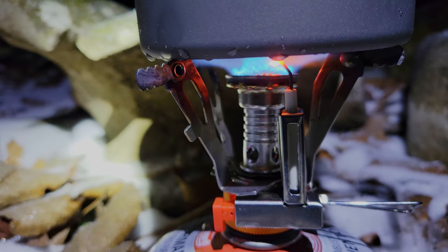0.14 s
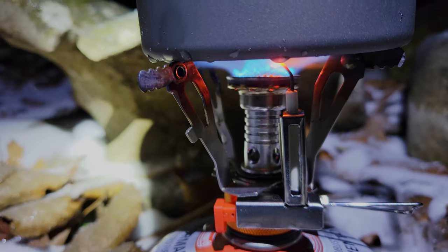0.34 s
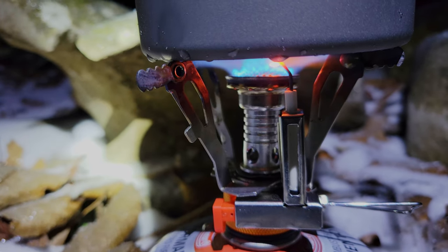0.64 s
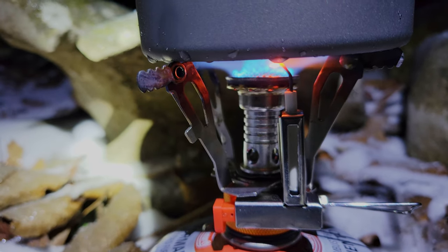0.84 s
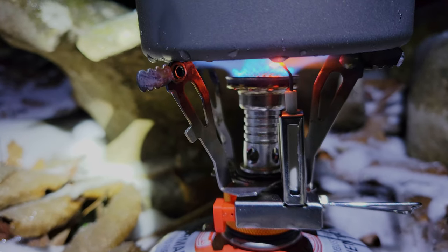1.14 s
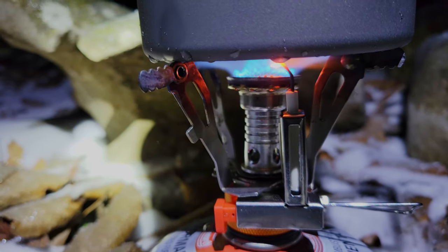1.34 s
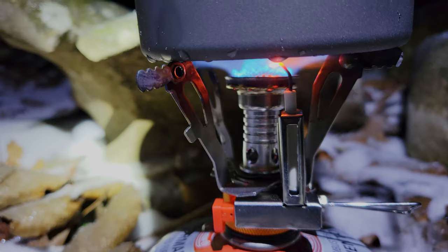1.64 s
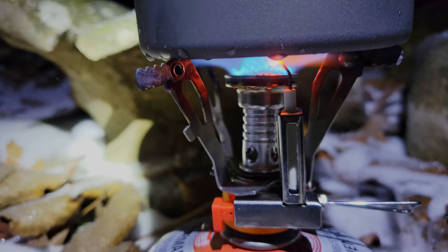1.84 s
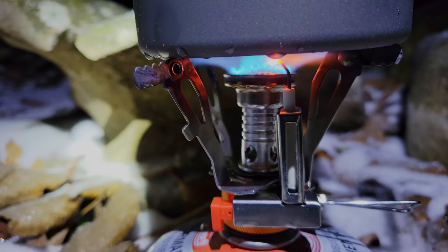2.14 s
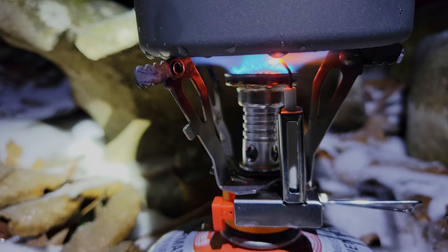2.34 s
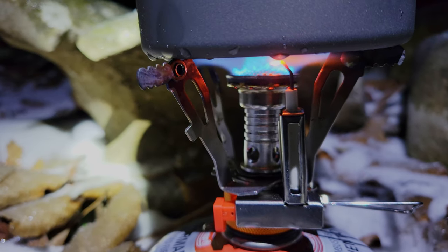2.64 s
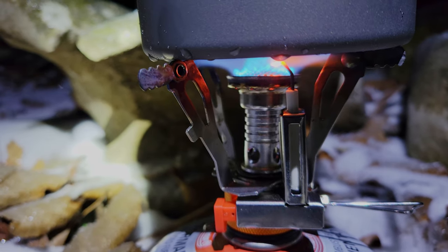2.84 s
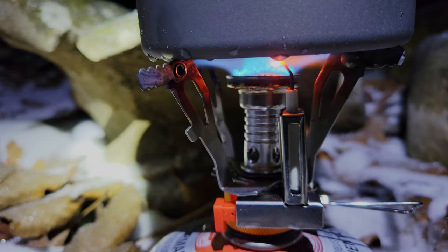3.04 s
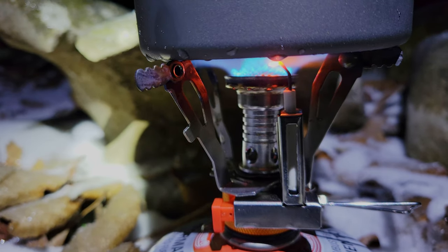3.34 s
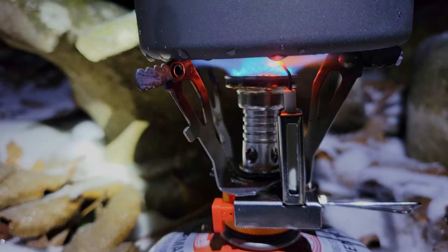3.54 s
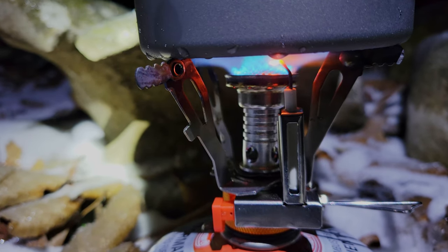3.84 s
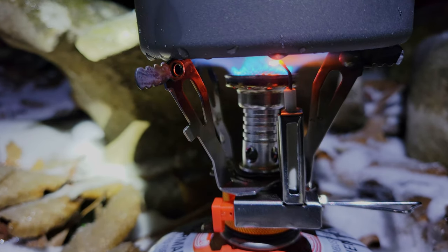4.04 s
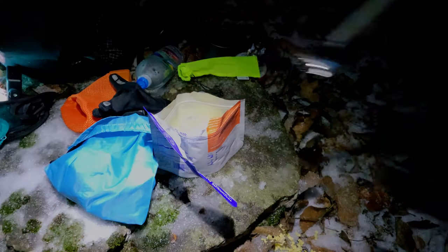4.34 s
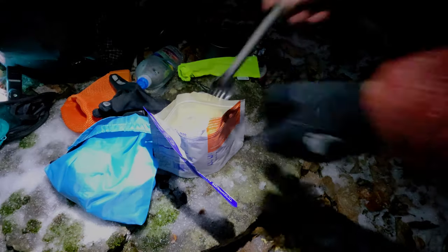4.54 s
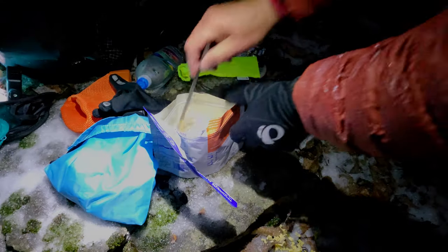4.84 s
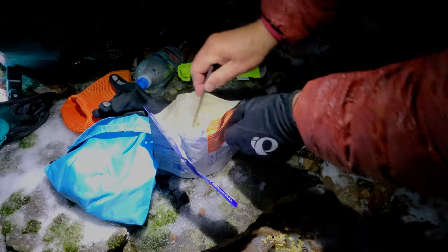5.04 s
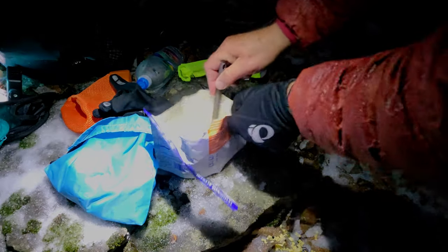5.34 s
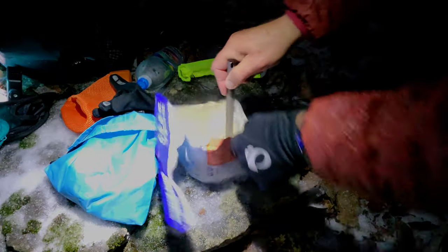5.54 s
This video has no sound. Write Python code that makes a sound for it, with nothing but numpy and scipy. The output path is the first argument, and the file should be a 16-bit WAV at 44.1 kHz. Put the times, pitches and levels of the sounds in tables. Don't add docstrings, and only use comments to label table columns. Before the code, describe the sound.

From 0 to about 4.1 s a gas camp stove burns steadily under a pot outdoors: a deep, slightly fluttering hum, a full low roar with a hollow tone beneath the pot, and a bright, fine hiss on top. Light rain adds sharp ticks on metal, dull tocks on wet stone and tiny high spits near the microphone. A dense crackly flurry of drops swells and quickly thins, peaking near 0.8 s. Stone drops are busiest from 1 to 3 s, then sparser. At about 4.1 s the roar stops abruptly in a hard cut, leaving a much lighter high hiss with faint low rumble. Drops patter irregularly on a foil pouch, some with a soft thud behind. From about 5.3 s a hand grips the foil, making quick crisp crinkles and faint dull thuds to the end. The sound is close, dry and bright, from a small camera microphone.

```python
import sys
import numpy as np
from scipy import signal
from scipy.fft import rfft, irfft
from scipy.io import wavfile
from scipy.ndimage import uniform_filter1d

SR = 44100
rng = np.random.default_rng(int(sys.argv[2]) if len(sys.argv) > 2 else 0)


def unload_audio(sound):
    columns = np.transpose(np.atleast_2d(sound))
    steps = np.round(np.clip(columns, -1, 1) * 32767)
    wavfile.write(sys.argv[1], SR, steps.astype(np.int16))


def ratio_of_db(decibels):
    return 10 ** (np.asarray(decibels, float) / 20)


N = 251370

THROB_HZ = 58.97
# multiple of THROB_HZ, level in dB, waver in dB.
THROB = [
    (1, -30.5, 1.1),
    (2.02, -40.5, 3.2),
]
# frequency in Hz, density in dB per Hz.
ROAR = [(28, -28), (45, -12.5), (96, -4.5), (190, -6.5), (281, -1.5), (345, -7), (445, -23), (570, -14),
        (850, -10.5), (1020, -14), (1200, -29), (1450, -29.5), (2000, -42.5), (3000, -43)]
# centre in Hz, width in Hz, level in dB.
WHISTLES = [
    (277.3, 123, -41),
    (94.8, 36, -57),
    (9970, 420, -52.5),
]
# frequency in Hz, density in dB per Hz.
STOVE_FIZZ = [(1200, -50), (1900, -33), (2200, -19), (2500, -7.5), (2950, -4.5), (3700, -8.5), (4900, -7),
              (6300, -9.5), (8000, -9), (11000, -7), (13000, -2.5), (14700, 3), (15300, 1.5), (15740, -4)]
# time in seconds, level in dB, ring in Hz.
STONE_DROPS = [(0.05, -39, 1570), (0.3915, -39, 2360), (0.416, -36, 1740), (0.523, -39, 2230),
               (.8987, -40, 1970), (.9556, -40, 2190), (.987, -41, 1870), (1.0547, -37, 2030),
               (1.0681, -41, 2280), (1.095, -36, 1940), (1.1606, -40, 1910), (1.3789, -35, 2040),
               (1.4948, -32.5, 1890), (1.5984, -34, 2260), (1.6296, -33, 2240), (1.922, -29, 2380),
               (1.9675, -36, 1960), (2.033, -37, 1990), (2.0472, -37, 2380), (2.0693, -40, 1900),
               (2.193, -34, 1740), (2.219, -35, 1590), (2.318, -40, 1690), (2.4056, -35, 2590),
                    (2.4232, -42, 1770), (2.4341, -37, 1950), (2.529, -33.5, 1610), (2.622, -26.5, 2000),
                    (2.7548, -32, 1400), (2.7702, -42, 1540), (2.8027, -25, 1500), (2.849, -33, 1710),
                    (2.8557, -41, 1760), (2.8824, -37, 1710), (2.9896, -34.5, 1640), (3.1653, -38, 1820),
                    (3.1906, -42, 1660), (3.5187, -38, 1860), (3.7877, -37.5, 1720), (4.0016, -40, 1850)]
# time in seconds, level in dB, ring in Hz, width in Hz.
POT_DROPS = [(.02, -35, 3640, 1350), (.1152, -36, 3920, 590), (.1471, -33, 2480, 2020),
             (.1571, -36, 4780, 1940), (.1723, -31, 3250, 2000), (.2003, -35, 5200, 990),
             (.265, -28.5, 5260, 1900), (.3064, -35, 4100, 300), (.4804, -32, 6550, 600),
             (.6237, -30, 5500, 3500), (.6661, -33, 4030, 1780), (.6912, -33, 3500, 2000),
             (.9678, -43, 2600, 1600), (1.1049, -33, 5970, 2500), (1.1262, -40, 2520, 760),
             (1.1351, -28, 2100, 2500), (1.2245, -37, 4440, 670), (1.2399, -46, 4260, 470),
             (1.2582, -38, 3650, 580), (1.3263, -30, 4500, 490), (1.7235, -39, 7150, 300),
             (1.8278, -26.5, 3660, 2120), (1.9786, -25, 9600, 2960), (2.2273, -34, 4230, 1010),
             (2.6866, -40, 4130, 300), (3.7179, -37, 8840, 650), (3.8235, -32, 7460, 460),
             (3.9595, -34, 3120, 2900)]
# rate per second, lowest level in dB, spread in dB, lowest ring in
# Hz, highest ring in Hz, width in Hz.
STOVE_DRIZZLE = (14, -46, 1, 1700, 3000, 700)
# time in seconds, level in dB.
SPITS = [(.0443, -28), (.3269, -29), (.4063, -32), (.4898, -32), (.6237, -26), (.9036, -36), (1.0342, -32),
         (1.1049, -27), (1.2245, -32), (1.2399, -35), (1.3263, -24), (1.5503, -26), (1.577, -34),
         (1.9786, -28), (2.2518, -32), (2.9177, -32), (3.4875, -30), (3.834, -27), (4.0825, -29),
         (4.2019, -28), (5.0988, -26), (5.2912, -33), (5.442, -31), (5.4855, -34), (5.5211, -28),
         (5.6526, -30)]
# frequency in Hz, level in dB.
SHOWER_COLOUR = [(500, -23), (1100, 8.5), (2200, -6.5), (5000, 1), (7000, -8), (10000, -5), (15000, -30)]
# time in seconds, level in dB, ring in Hz, width in Hz.
SHOWER_DROPS = [(.673, -35, 2510, 1990), (.7004, -39, 2670, 1600), (.718, -37, 3000, 1570),
                (0.732, -32, 4800, 3530), (0.737, -35, 5890, 1550), (.7445, -35, 2950, 1560),
                (.7541, -33, 5340, 5640), (0.759, -33, 5200, 1310), (0.7676, -33, 2530, 1560),
                (0.7789, -27, 3400, 3340), (0.7894, -26, 3630, 3000), (0.7975, -30, 2300, 400),
                (0.802, -29, 2800, 2500), (0.8077, -36, 2200, 1200), (0.819, -34, 2500, 1500),
                (0.835, -30, 4890, 4770), (0.84, -42, 2090, 300)]
# start in seconds, stove gone in seconds, pouch fade-in in seconds.
CUT = (4.076, 4.112, 0.0064)
# frequency in Hz, density in dB per Hz.
POUCH_FIZZ = [(20, -27), (60, -3.5), (123, -8.5), (260, -18), (1000, -17), (2200, -21), (3000, -13.5),
              (4400, -8), (6280, -12), (10800, -7.5), (13000, -3.5), (14700, 2.5), (15300, 0),
              (15740, -2.5)]
# time in seconds, level in dB, ring in Hz, width in Hz.
POUCH_DROPS = [(4.1234, -34.5, 1900, 1910), (4.1308, -40, 1140, 400), (4.1377, -38, 1520, 890),
               (4.1807, -37.5, 1140, 980), (4.2019, -30.5, 7260, 1060), (4.2948, -38.5, 1460, 560),
               (4.3225, -40, 1550, 430), (4.3699, -34, 1460, 750), (4.3875, -40, 1320, 700),
               (4.4651, -34, 2640, 2290), (4.5134, -32, 1360, 454), (4.5246, -34, 5300, 800),
               (4.6848, -43.5, 1820, 1130), (4.7309, -41, 1169, 940), (4.7666, -38, 2550, 1930),
               (4.7937, -46, 2480, 910), (4.8109, -39, 3460, 550), (4.8535, -37, 1900, 1400),
               (4.8898, -36, 1980, 490), (4.9478, -36, 1060, 380), (4.9613, -28, 2240, 1710),
               (5.0197, -39, 1370, 1140), (5.0837, -34.5, 4770, 960), (5.1225, -38, 2126, 1070),
               (5.2027, -41, 1110, 300)]
# rate per second, lowest level in dB, spread in dB, lowest ring in
# Hz, highest ring in Hz, width in Hz.
POUCH_DRIZZLE = (14, -48, 0.5, 1000, 2500, 700)
# time in seconds, level in dB, ring in Hz, width in Hz.
THUDS = [
    (4.7309, -44, 600, 250),
    (4.8535, -33.5, 640, 179),
    (5.0197, -38, 930, 170),
    (5.04, -46, 900, 250),
    (5.2671, -48, 550, 300),
    (5.2935, -43, 500, 300),
    (5.417, -48, 600, 400),
    (5.5496, -47, 450, 300),
]
# time in seconds, level in dB, ring in Hz, width in Hz.
CREASES = [(5.2672, -29.5, 1410, 810), (5.2911, -36.5, 2200, 950), (5.3261, -33, 7330, 750),
           (5.3317, -42, 1670, 1240), (5.364, -41, 1810, 1090), (5.3694, -39, 1230, 570),
           (5.3812, -33.5, 1280, 600), (5.381, -31, 4530, 3940), (5.417, -26, 2530, 1950),
           (5.442, -30.5, 1920, 920), (5.4473, -41, 2310, 1180), (5.4855, -39, 4000, 460),
           (5.5007, -40, 1560, 730), (5.506, -39, 1180, 300), (5.5496, -33.5, 1950, 1440),
           (5.5726, -42, 845, 720), (5.5926, -39, 6260, 302), (5.6077, -42.5, 1970, 820),
           (5.6526, -35.5, 1830, 780), (5.6671, -47, 1310, 830), (5.6987, -32, 1160, 890)]


def evened(x):
    return x / np.sqrt(np.mean(x ** 2) + 1e-20)


def coloured(x, points):
    f, db = np.transpose(points)
    hz = np.fft.rfftfreq(N, 1 / SR)
    curve_db = np.interp(np.log(hz + 1), np.log(f + 1), db)
    return evened(irfft(rfft(x) * ratio_of_db(curve_db), N))


def wander(top_hz):
    t = np.arange(0, N + 64, 64) / SR
    spread = np.geomspace(.03, 1, 30)
    phases = rng.random(len(spread))
    slow = sum(np.sin(2 * np.pi * (k * top_hz * t + p)) / k ** 0.23 for k, p in zip(spread, phases))
    return np.interp(np.arange(N) / SR, t, evened(slow))


def tick(hz, width, size):
    t = np.arange(size) / SR
    u = np.pi * width * t
    ring = u * np.exp(-u) * np.sin(2 * np.pi * hz * t)
    return ring / np.linalg.norm(ring)


def whistle(hz, width, db):
    f = np.fft.rfftfreq(N, 1 / SR)
    resonance = 1 + (2 * (f - hz) / width) ** 2
    tone = evened(irfft(rfft(rng.standard_normal(N)) / resonance, N))
    return ratio_of_db(db + 0.28 * wander(top_hz=12.0)) * tone


def flame():
    turns = np.cumsum(THROB_HZ + 0.36 * wander(top_hz=4.77)) / SR
    throb = np.zeros(N)
    for k, db, waver in THROB:
        level = np.sqrt(2) * ratio_of_db(db + waver * wander(top_hz=7.0))
        throb += level * np.cos(2 * np.pi * k * turns + 0.69 * k)
    roar = ratio_of_db(-27.5) * coloured(rng.standard_normal(N), ROAR)
    flow = roar + sum(whistle(*row) for row in WHISTLES)
    flow /= uniform_filter1d(flow ** 2 / np.mean(flow ** 2), size=3000) ** 0.54
    return throb + flow


def fizz(colour, level_db, per_s, spread_db, wash, gust_db):
    size = (rng.random(N) < per_s / SR) * ratio_of_db(spread_db * np.minimum(rng.exponential(1, N), 2.8))
    pitches = np.linspace(600, 17400, 16)
    kind = rng.integers(0, len(pitches), N)
    grains = np.zeros(N)
    for k, hz in enumerate(pitches):
        grains += signal.oaconvolve(size * (kind == k), tick(hz, 1950.0, size=128))[:N]
    puffs = (rng.random(N) < 60. / SR) * rng.uniform(0.32, 1, N)
    fade = np.exp(-np.arange(2048) / SR / 0.0077)
    gusts = 1 + 0.32 * signal.oaconvolve(puffs, fade)[:N]
    rain = evened(grains) + wash * rng.standard_normal(N)
    mix = gusts * rain * ratio_of_db(gust_db * wander(top_hz=34.1))
    return coloured(mix, colour) * ratio_of_db(level_db)


def drops(table, gain_db, splash_db, splash_s, widen_hz, snap_db):
    out, t = np.zeros(N + 2048), np.arange(1024) / SR
    spray = rng.standard_normal((len(table), 1024))
    snap = tick(4200.0, 2300.0, size=64)
    for (s, db, hz, width), noise in zip(table, spray):
        width = np.hypot(width, widen_hz)
        burst = noise * np.exp(-t / splash_s)
        splash = signal.oaconvolve(burst, tick(hz, 1.4 * width + 1500, size=64))[:1024]
        width = 1.45 * width
        sound = tick(hz, width, size=1024) + ratio_of_db(splash_db) * splash / np.linalg.norm(splash)
        at = round((s - 1.5 / (np.pi * width)) * SR)
        out[at:at + 1024] += ratio_of_db(gain_db + db) * sound
        at = round(s * SR) - 8
        out[at:at + 64] += ratio_of_db(gain_db + db + snap_db) * snap
    no_bass = signal.butter(2, 300., "high", fs=SR, output="sos")
    return signal.sosfilt(no_bass, out[:N])


def stone_rows():
    return [(s, db, hz, max(820 + 50 * (db + 39.5), 0)) for s, db, hz in STONE_DROPS]


def drizzle(rule, start, end):
    per_s, db, spread_db, low_hz, high_hz, width = rule
    slots = np.arange(start, end, 1 / per_s)
    when, size, pitch = rng.random((200, 3))[:len(slots)].T
    level_db = db - spread_db * np.log(1 - .95 * size)
    ring_hz = low_hz * (high_hz / low_hz) ** pitch
    return np.transpose([slots + when / per_s, level_db, ring_hz, width + 0 * slots])


def spits(gain_db):
    out, spit = np.zeros(N), tick(13800.0, 2000., size=64)
    for (s, db), noise in zip(SPITS, rng.standard_normal((len(SPITS), 96))):
        mist = signal.oaconvolve(noise * np.hanning(96), spit)[:128]
        at = round(s * SR) - 48
        out[at:at + 128] += ratio_of_db(gain_db + db) * mist / np.linalg.norm(mist)
    return out


def shower():
    peak_s, level_db, swell_db_per_s, thin_db_per_s, round_s = .78, -33, 140, 180, 0.014
    clicks = (rng.random(N) < 2500. / SR) * ratio_of_db(2.0 * rng.exponential(1, N)) * rng.standard_normal(N)
    away = np.arange(N) / SR - peak_s
    slope = np.where(away < 0, swell_db_per_s, thin_db_per_s)
    fall_db = slope * (np.hypot(away, round_s) - round_s)
    return coloured(clicks, SHOWER_COLOUR) * ratio_of_db(level_db - fall_db)


def far_throb():
    return ratio_of_db(-65.0) * np.sqrt(2) * np.cos(2 * np.pi * THROB_HZ * np.arange(N) / SR)


def scene():
    t = np.arange(N) / SR
    start, end, quick = CUT
    stove = flame() + shower()
    stove += fizz(STOVE_FIZZ, level_db=-33.5, per_s=4000., spread_db=2.0, wash=1.87, gust_db=0.1)
    pouch = fizz(POUCH_FIZZ, level_db=-29.5, per_s=4000., spread_db=3.5, wash=1.72, gust_db=0.3)
    pouch += far_throb()

    metal = POT_DROPS + SHOWER_DROPS
    foil = POUCH_DROPS + CREASES + THUDS
    faint = np.vstack([drizzle(STOVE_DRIZZLE, 0.022, start), drizzle(POUCH_DRIZZLE, end, 5.6)])
    ticks = drops(stone_rows(), gain_db=17.5, splash_db=-7, splash_s=0.002, widen_hz=600., snap_db=-9)
    ticks += drops(metal, gain_db=17.5, splash_db=-7, splash_s=0.002, widen_hz=500., snap_db=-14)
    ticks += drops(foil, gain_db=18., splash_db=-6.0, splash_s=0.0028, widen_hz=200., snap_db=-5)
    ticks += drops(faint, gain_db=15.0, splash_db=-2, splash_s=0.0022, widen_hz=300., snap_db=-5)
    ticks += spits(gain_db=18.5)

    stove_gain = np.interp(t, [start, start + quick, end - .004, end], [1, 0.37, 0.47, 0.00064])
    pouch_gain = np.interp(t, [start, start + quick], [0, 1])
    return (stove * stove_gain + pouch * pouch_gain + ticks)[None]


def low_pass(x):
    return signal.sosfilt(signal.butter(12, 16650, fs=SR, output="sos"), x)


def record(dry):
    below_edge = np.fft.rfftfreq(N, 1 / SR) < 15740
    limited = irfft(rfft(dry) * below_edge, N)
    return low_pass(limited)


dry = scene()
out = record(dry)
unload_audio(out)
```